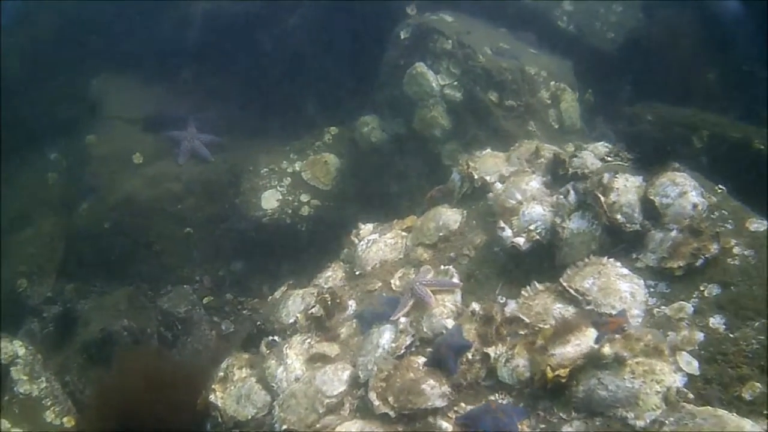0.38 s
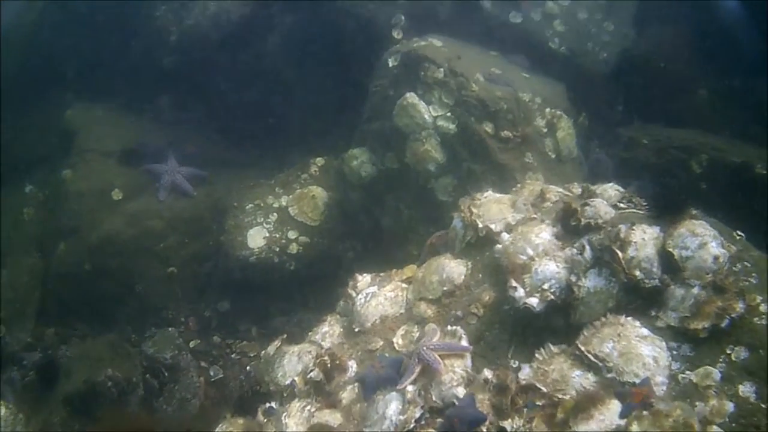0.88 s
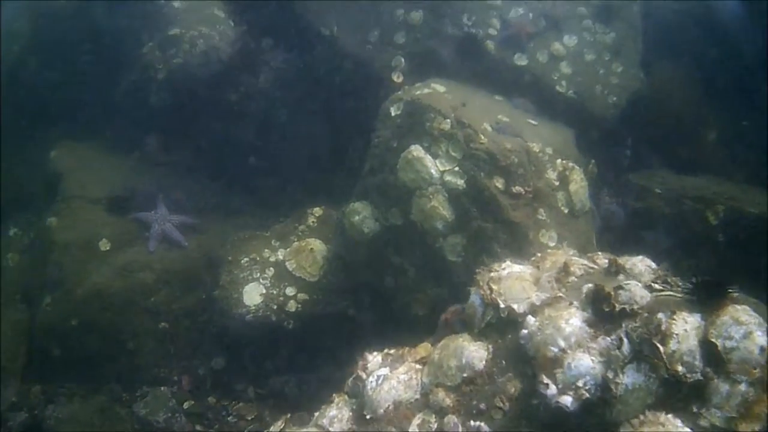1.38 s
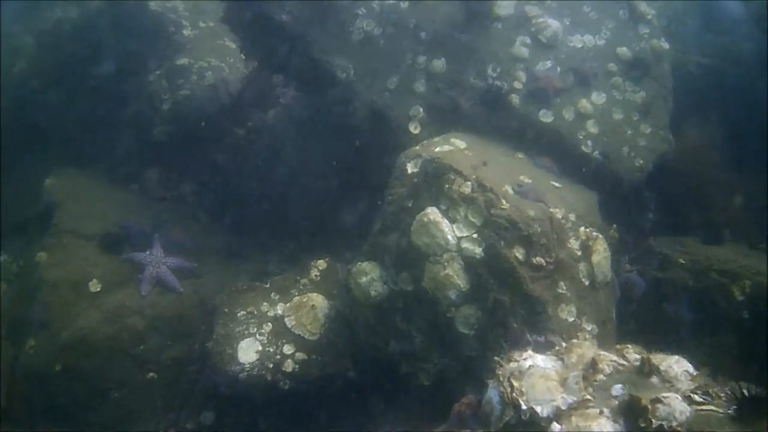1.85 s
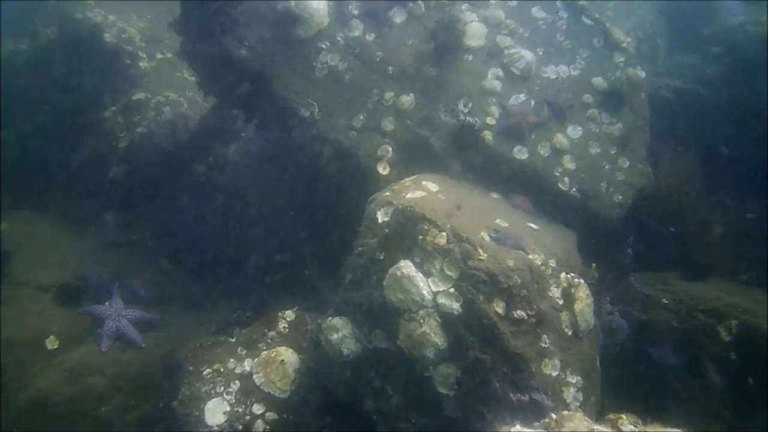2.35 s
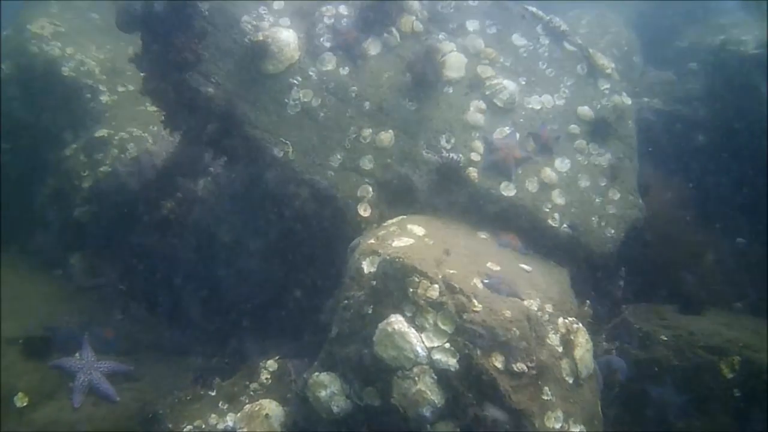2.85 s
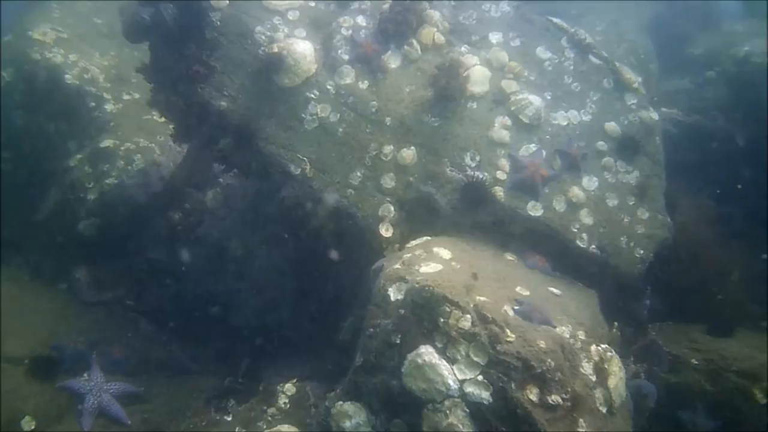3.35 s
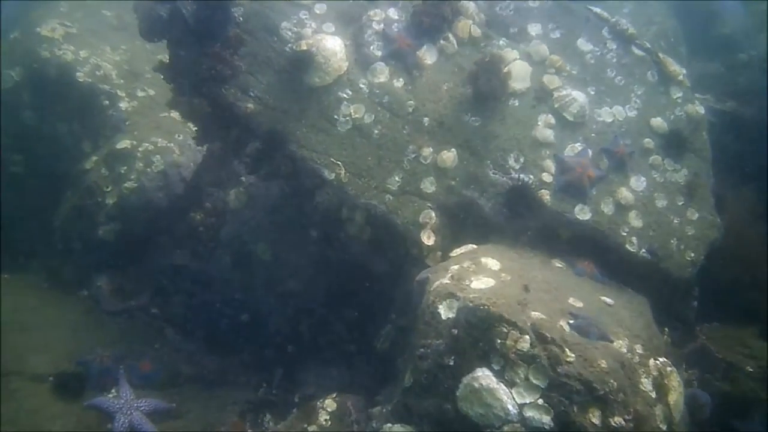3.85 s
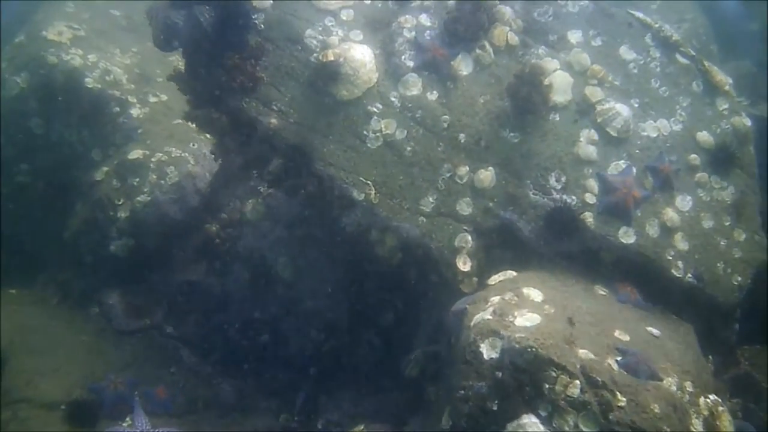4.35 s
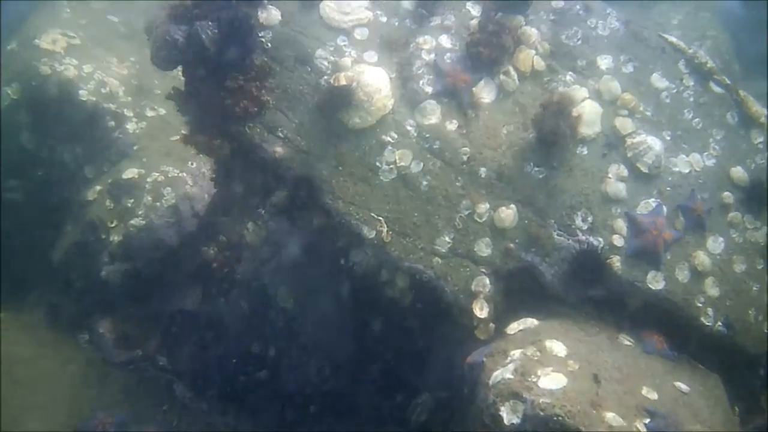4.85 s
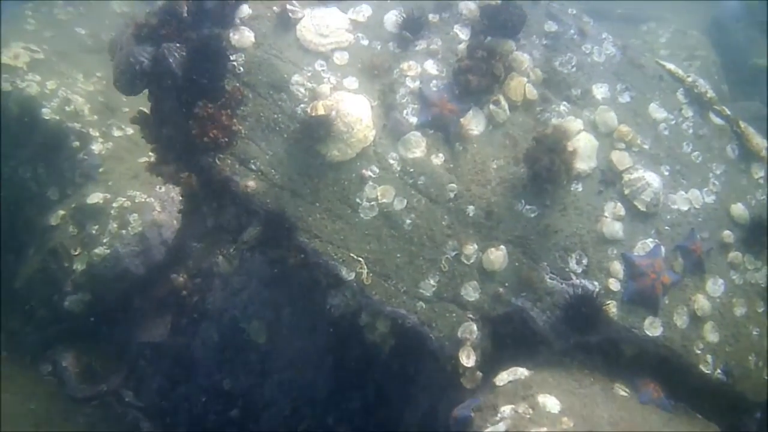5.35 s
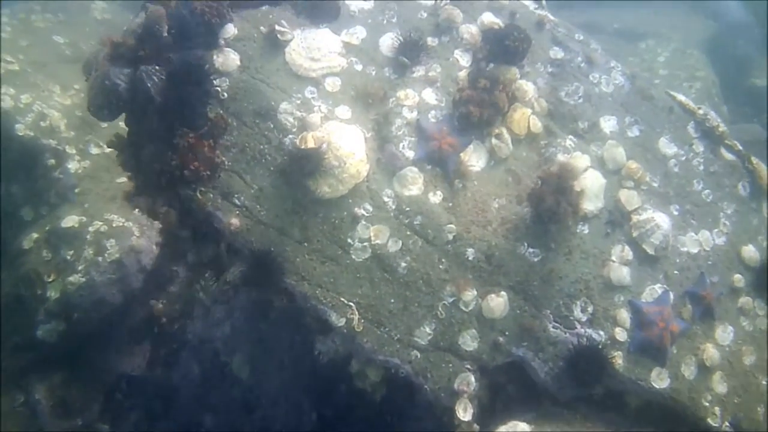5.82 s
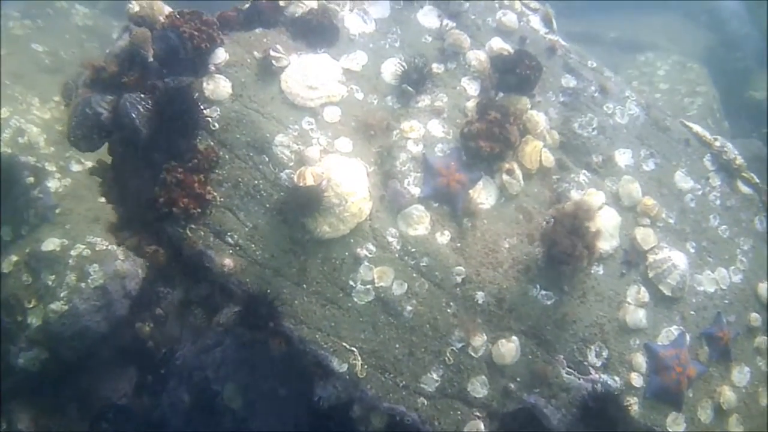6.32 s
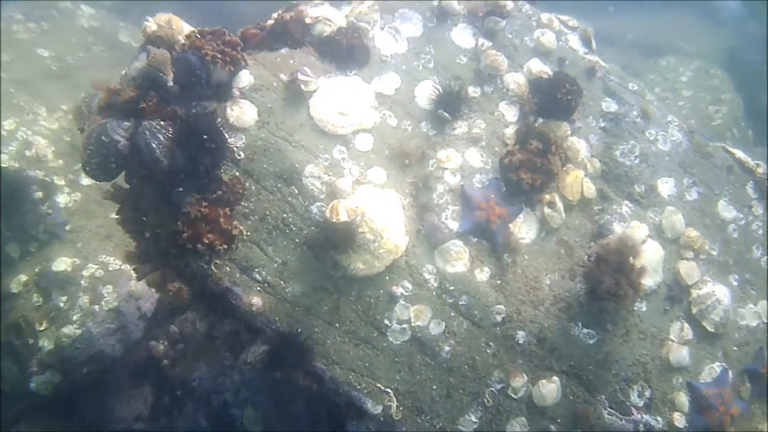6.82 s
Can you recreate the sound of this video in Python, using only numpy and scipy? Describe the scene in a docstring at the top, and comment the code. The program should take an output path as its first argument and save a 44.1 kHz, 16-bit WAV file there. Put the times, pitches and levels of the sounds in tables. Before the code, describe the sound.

Muffled undersea rumble rises in slow swells while camera electronics hum and buzz in a rapid flutter; sparse tiny clicks, one dull soft thump near the end.

```python
"""A low uneven rumble over hiss: water surges against a sealed camera under the sea.
The surge is shaped noise that rises in swells; the amplifier hiss is steady shaped noise.
The camera's electronics leak in as a row-pulse buzz that pauses once a frame
and as a faster ticking hum of pulses that set resonances ringing.
A few faint clicks and one dull thump ring the housing as decaying modes."""
import sys
import numpy as np
from scipy import signal
from scipy.fft import rfft, irfft, next_fast_len
from scipy.io import wavfile

SR = 44100
rng = np.random.default_rng(int(sys.argv[2]) if len(sys.argv) > 2 else 0)


def generate_wav(sig):
    """Save sig (samples, or channels by samples) to the path in sys.argv[1] as 16-bit PCM at SR."""
    pcm = np.round(np.clip(np.atleast_2d(sig).T, -1, 1) * 32767).astype(np.int16)
    wavfile.write(sys.argv[1], SR, pcm)


def level_to_linear(level):
    """Convert decibel levels to linear amplitude factors, elementwise."""
    exponent = np.asarray(level, float) / 20
    return 10 ** exponent


N = 317520  # samples, 7.2 s


def resonate(excitation, hz, t60_s):
    """Two-pole resonator: a unit click sets a decaying sine of height 1 ringing."""
    radius = level_to_linear(-60 / (t60_s * SR))
    angle = 2 * np.pi * hz / SR
    feedback = [1, -2 * radius * np.cos(angle), radius * radius]
    return signal.lfilter([0, np.sin(angle)], feedback, excitation + 1e-18)


def impulses(times_s, heights):
    """Clicks shared between neighbouring samples to place them at fractional times."""
    position = np.asarray(times_s) * SR
    whole = position.astype(int)
    fraction = position - whole
    out = np.zeros(N + 2)
    np.add.at(out, whole, heights * (1 - fraction))
    np.add.at(out, whole + 1, heights * fraction)
    return out[:N]


def coloured_noise(spectrum):
    """White noise filtered to a density in dB per Hz, interpolated over log frequency."""
    size = next_fast_len(N)
    hz, density_db = np.transpose(spectrum)
    bins_hz = np.maximum(np.arange(size // 2 + 1) * SR / size, 1e-3)
    gain = level_to_linear(np.interp(np.log(bins_hz), np.log(hz), density_db)) * np.sqrt(SR / 2)
    return irfft(rfft(rng.standard_normal(size)) * gain, size)[:N]


def lowpass(hz):
    """Second-order low-pass sections, flat below the corner."""
    return signal.butter(2, hz, fs=SR, output="sos")


def amplifier_hiss():
    """Steady amplifier noise whose density falls towards the treble."""
    # noise density of the amplifier: frequency_hz, density_db (per Hz)
    hiss_spectrum = [(60, -83.5), (200, -80), (235, -80.5), (265, -80.5), (300, -83.5), (400, -85),
                     (1000, -90), (1300, -91.5), (2500, -95.5), (4000, -97.5), (6000, -98.5), (7100, -99)]
    return coloured_noise(hiss_spectrum)


def ticking_hum():
    """Regular short pulses ring the same circuits; rings overlap and merge into steady tones."""
    # circuit resonances set off by each tick: frequency_hz, level_db, t60_s
    tick_rings = [(256, -50, .15), (312, -52, .07), (345, -62, .05), (4499, -57.5, .4), (4530, -56, .024)]
    # direction of each resonance's first swing: sign (+1 or -1)
    first_swings = [1, -1, 1, 1, 1]
    # delay of each resonance behind the tick: lag_s
    ring_lags = [.0033, .0033, .0033, .0018, .0018]
    tick_hz, first_tick_s, tick_length_s = 36.10846, .0012, .0006
    times_s = np.arange(first_tick_s, N / SR - .01, 1 / tick_hz)
    flat_pulse = np.ones(round(tick_length_s * SR))
    out = level_to_linear(-48) * np.convolve(impulses(times_s, 0.84), flat_pulse)[:N]
    for (hz, level_db, t60_s), swing, lag_s in zip(tick_rings, first_swings, ring_lags):
        out += swing * level_to_linear(level_db) * resonate(impulses(times_s + lag_s, 1), hz, t60_s)
    return out


def readout_buzz():
    """The supply shifts during each frame's read-out, under a burst of narrow row pulses."""
    # harmonics of the row pulse: harmonic_number, peak_db
    row_harmonics = [(1, -49.8), (2, -52.3), (3, -58.1), (4, -64.4), (5, -67.4), (6, -64.3), (7, -68.1),
                     (8, -72), (9, -77.3), (10, -70), (11, -75)]
    frame_hz, row_hz = 11.379775, 721.95
    busy_from_s, busy_s, first_row_s = .0432, .0623, .04421
    row_duty = .24  # share of a row taken by its pulse
    row_fade_s = .00115  # time constant
    supply_step = level_to_linear(-44.5)

    t = np.arange(N) / SR
    busy = ((t - busy_from_s) * frame_hz) % 1 < busy_s * frame_hz
    since_first_row_s = ((t - first_row_s) * frame_hz) % 1 / frame_hz
    rows = since_first_row_s * row_hz
    # a constant level under the pulses fades along with them
    pulses = supply_step * row_duty
    for harmonic, peak_db in row_harmonics:
        # a flat-topped pulse in mid-row: its harmonics change sign from lobe to lobe
        sign = np.sign(np.sinc(harmonic * row_duty))
        pulses = pulses + level_to_linear(peak_db) * sign * np.cos(2 * np.pi * harmonic * (rows - .5))
    # once the read-out stops, the last row pulses die away
    overrun_s = np.maximum(since_first_row_s + first_row_s - busy_from_s - busy_s, 0)
    return supply_step * (busy - busy.mean()) + pulses * np.exp(-overrun_s / row_fade_s)


def housing_clicks():
    """Taps, each with a short scratch, drive the housing modes near their own pitch hardest."""
    # clicks on the housing: start_s, level_db, strongest_hz, spread_octaves
    click_events = [(.963, -52, 1400, .4), (1.050, -43.5, 1150, 1.5), (1.272, -53, 3700, .6),
                    (1.311, -51, 2500, .9), (3.337, -56, 900, .5), (4.384, -46.5, 2020, .3),
                    (6.116, -48.5, 1600, 1.0)]
    # housing modes: frequency_hz, level_db, t60_s
    housing_modes = [(820, -4, .04), (990, 0, .07), (1400, -6, .035), (1750, -4, .04), (2030, -3, .05),
                     (2900, -4, .025), (3600, -2, .022), (4200, -3, .02)]
    contact_s = 0.0058  # time constant of the scratch
    start_s, click_db, centre_hz, spread_octaves = np.transpose(click_events)
    contact = np.exp(-np.arange(SR // 50) / (contact_s * SR))
    contact /= np.sqrt(np.sum(contact ** 2))
    out = np.zeros(N)
    for hz, mode_db, t60_s in housing_modes:
        detune = np.log2(hz / centre_hz) / spread_octaves
        tap = impulses(start_s, level_to_linear(click_db + mode_db - 10 * detune ** 2))
        scratch = signal.fftconvolve(tap, contact)[:N] * rng.standard_normal(N)
        out += resonate(tap + level_to_linear(-6) * scratch, hz, t60_s)
    return out


def dull_thump():
    """A soft push: a low-passed click into one low mode, swinging down first."""
    click = impulses([6.943], -level_to_linear(-23.5))  # level before softening
    push = signal.sosfilt(lowpass(140), click)
    return resonate(push, 52, 0.15)


def water_surge():
    """Water pressure noise: slow sway, a heave that rises in swells, a lumpy rumble partly following."""
    # pressure noise density before the swells: frequency_hz, density_db (per Hz)
    surge_spectrum = [(1, -52), (2.5, -41.5), (5, -42.5), (9, -49.5), (17, -55.5), (35, -65.5), (100, -71),
                      (160, -80), (400, -91.5), (1000, -110)]
    # swells of water against the housing: middle_s, half_length_s, rise_db
    swells = [(1.55, .35, 6.5), (2.45, .3, 4), (4.25, .3, 3.5), (5.2, .25, 2.5), (6.3, .15, 5)]
    calm_db = -2  # heave between swells, against the surge spectrum
    rumble_follows = .4  # share of the heave's level in dB that reaches the rumble
    lumps_per_s, lumps_rms_db = 4, 1  # low-pass corner and spread of the level wander

    t = np.arange(N) / SR
    heave_db = calm_db + sum(rise_db * np.exp(-((t - middle_s) / half_s) ** 2)
                             for middle_s, half_s, rise_db in swells)
    lumps = signal.sosfilt(lowpass(lumps_per_s), rng.standard_normal(N))
    lumps_db = lumps_rms_db * lumps / lumps.std()

    pressure = coloured_noise(surge_spectrum)
    sway = signal.sosfiltfilt(lowpass(12), pressure)
    sway_and_heave = signal.sosfiltfilt(lowpass(45), pressure)
    heave = level_to_linear(heave_db) * (sway_and_heave - sway)
    rumble = level_to_linear(lumps_db + rumble_follows * heave_db) * (pressure - sway_and_heave)
    return sway + heave + rumble


def scene():
    """Amplifier hiss, electrical leakage, knocks on the housing and water, in one channel."""
    electronics = amplifier_hiss() + ticking_hum() + readout_buzz()
    knocks = housing_clicks() + dull_thump()
    return (electronics + knocks + water_surge())[None]


def roll_off(x):
    """The treble ends steeply here."""
    return signal.sosfilt(signal.butter(12, 8140, fs=SR, output="sos"), x)


def record(dry):
    """The anti-alias filter of a low sampling rate cuts the top; the converter adds a small offset."""
    # anti-alias filter response: frequency_hz, gain_db
    top_cut = [(7000, 0), (7450, -3), (7700, -8), (7900, -16), (8100, -25), (8350, -42), (9000, -80)]
    size = next_fast_len(N + SR // 10)
    hz, gain_db = np.transpose(top_cut)
    bins_hz = np.arange(size // 2 + 1) * SR / size
    filtered = irfft(rfft(dry, size) * level_to_linear(np.interp(bins_hz, hz, gain_db)), size)[:, :N]
    finished = filtered - .0271  # converter offset, of full scale
    return roll_off(finished)


dry = scene()
out = record(dry)
generate_wav(out)
```